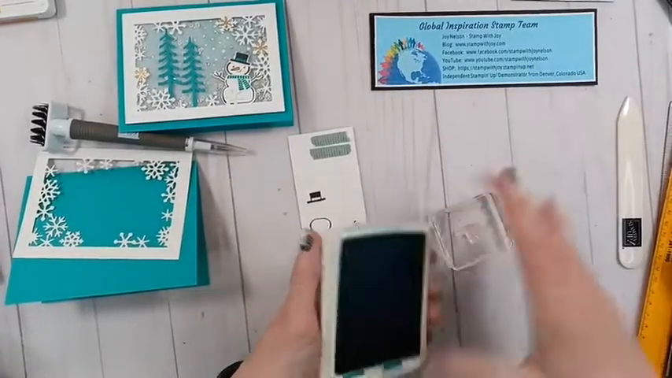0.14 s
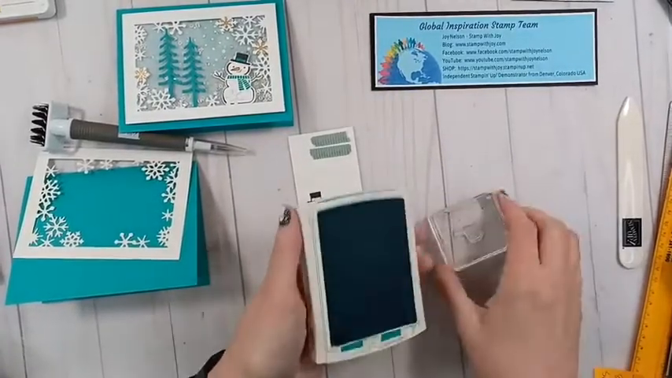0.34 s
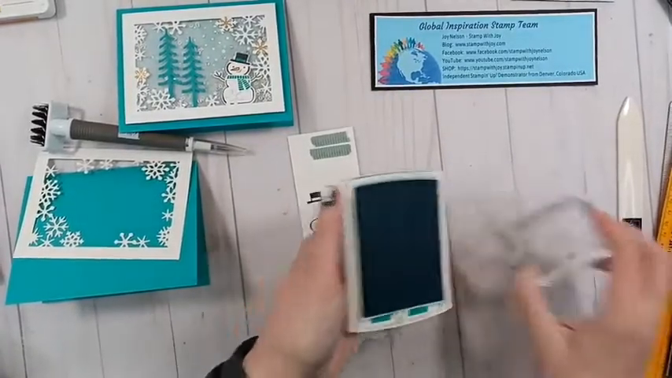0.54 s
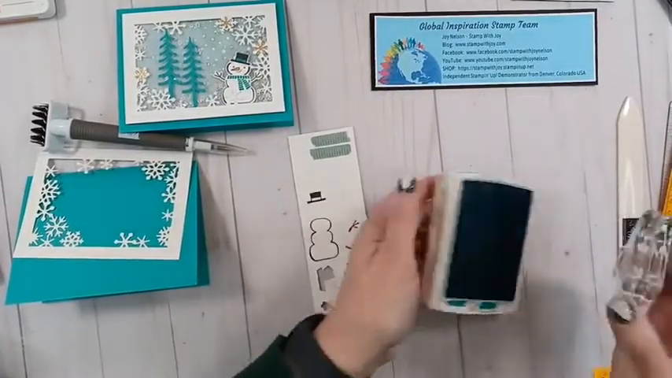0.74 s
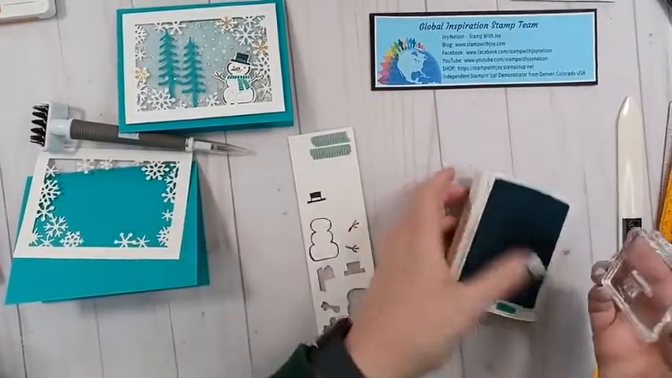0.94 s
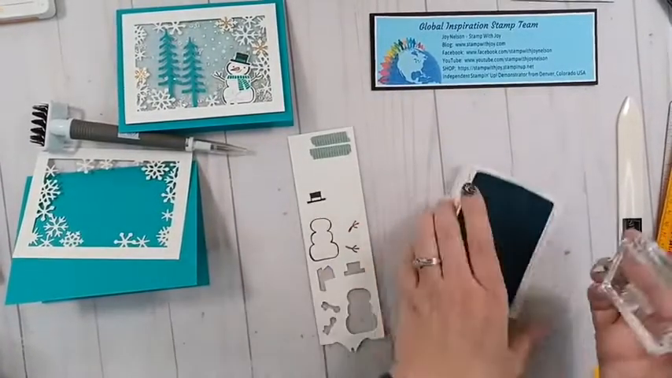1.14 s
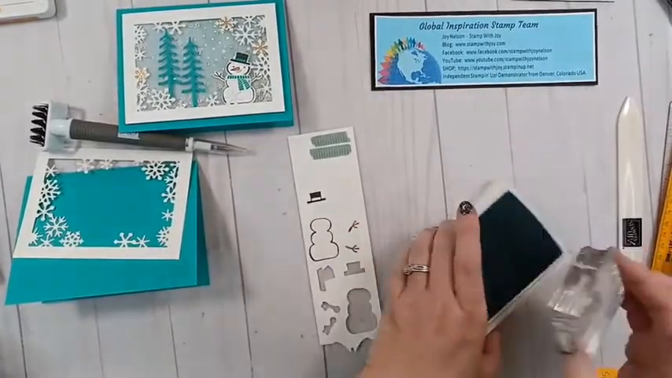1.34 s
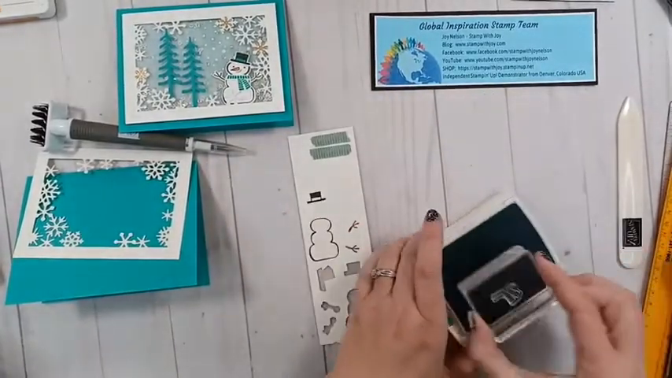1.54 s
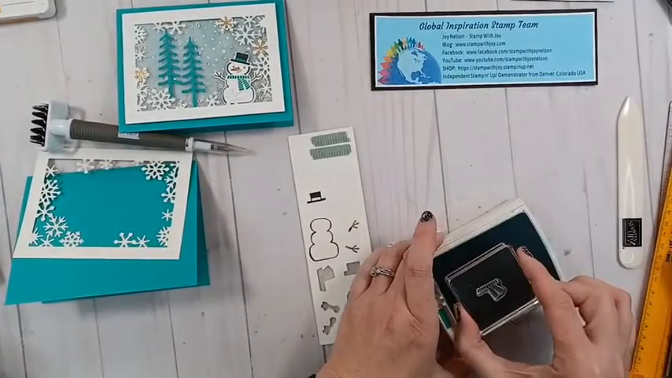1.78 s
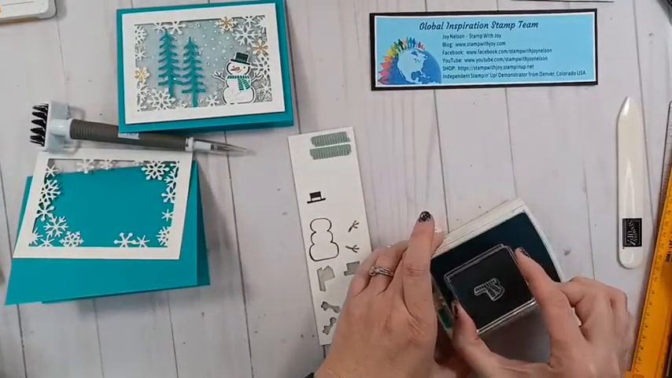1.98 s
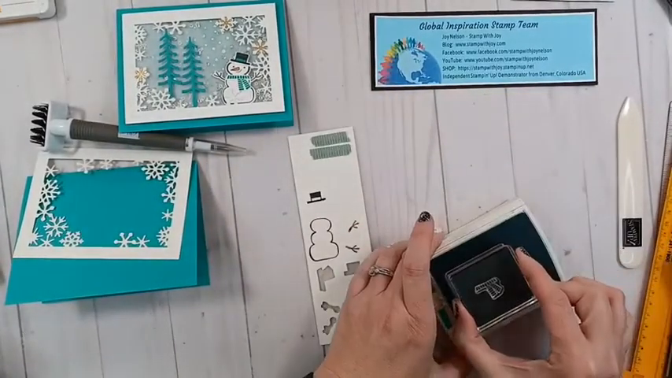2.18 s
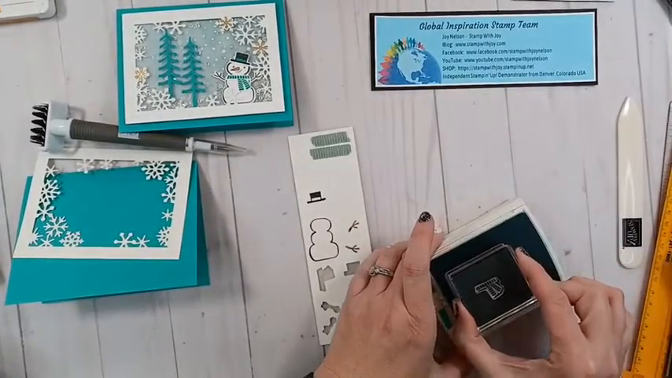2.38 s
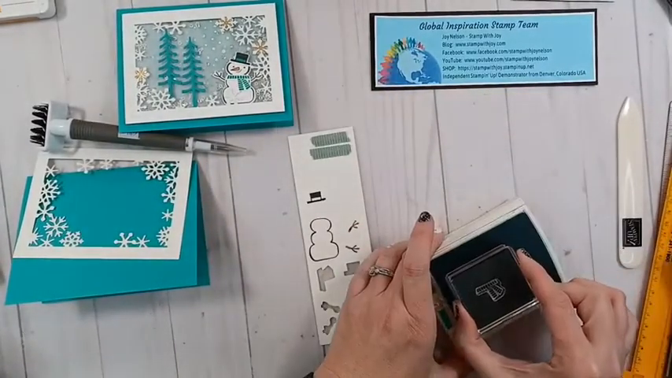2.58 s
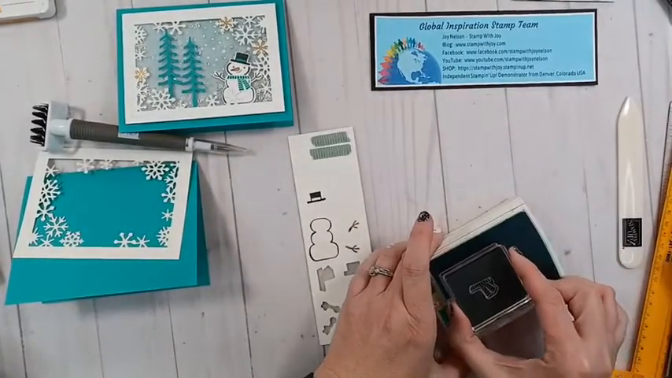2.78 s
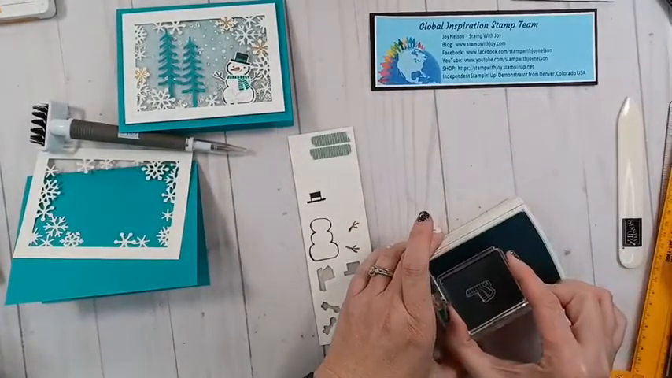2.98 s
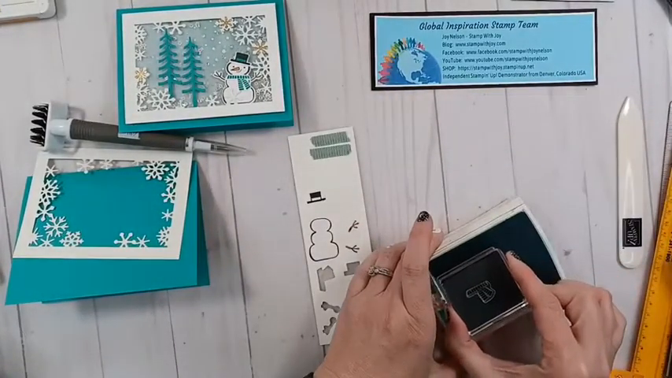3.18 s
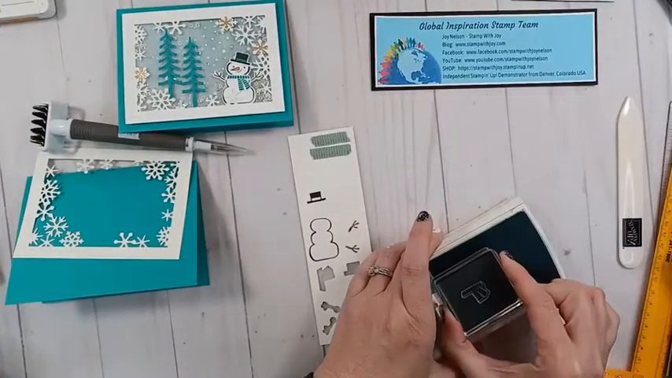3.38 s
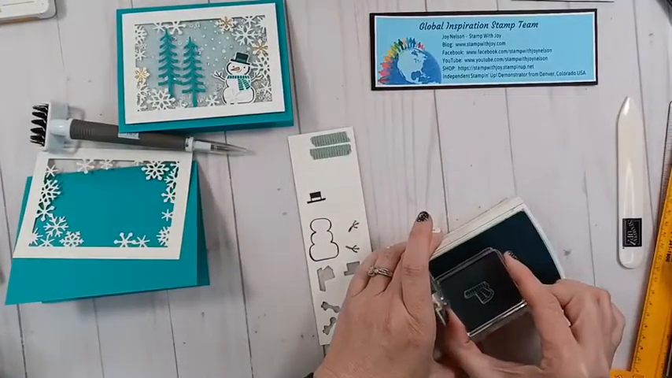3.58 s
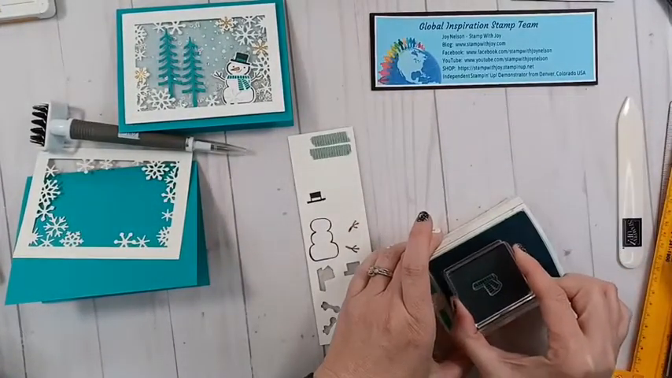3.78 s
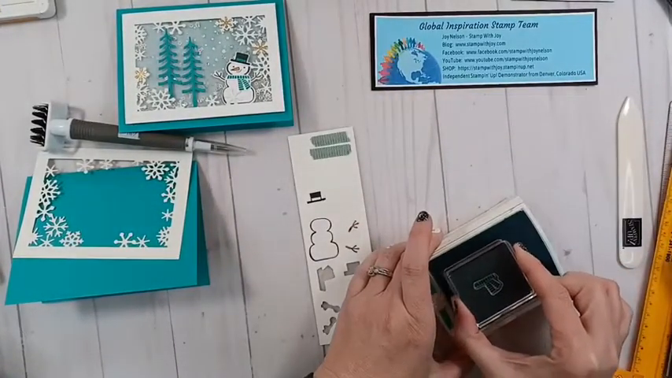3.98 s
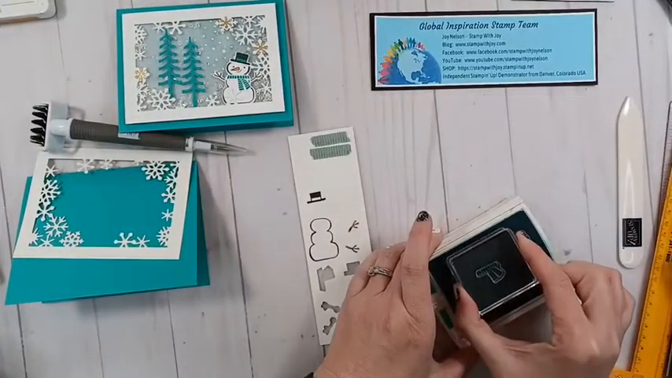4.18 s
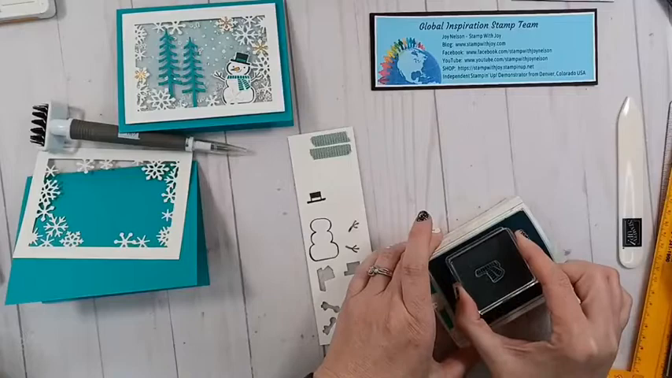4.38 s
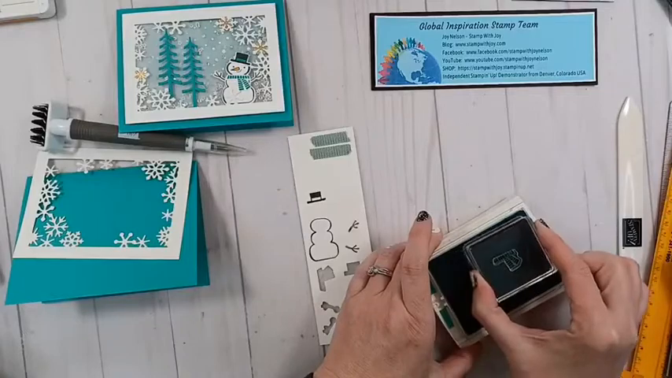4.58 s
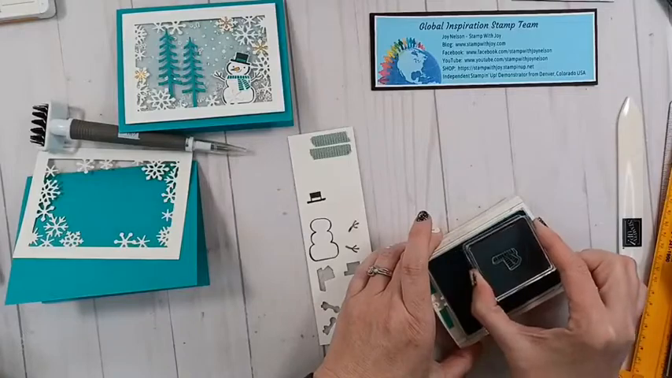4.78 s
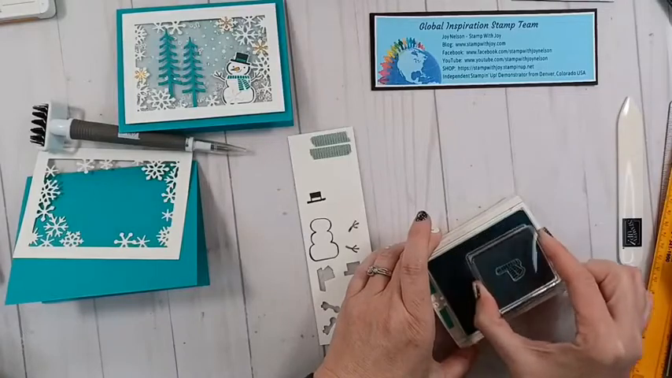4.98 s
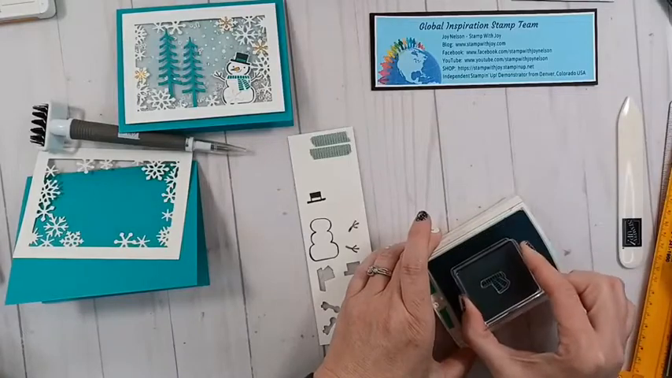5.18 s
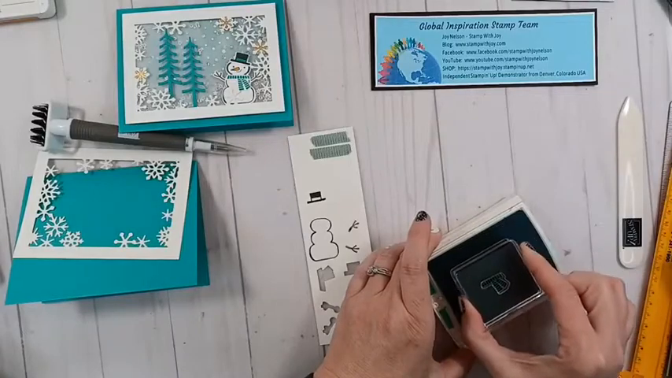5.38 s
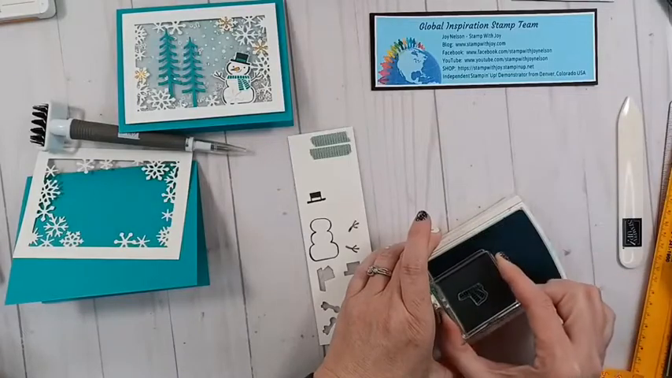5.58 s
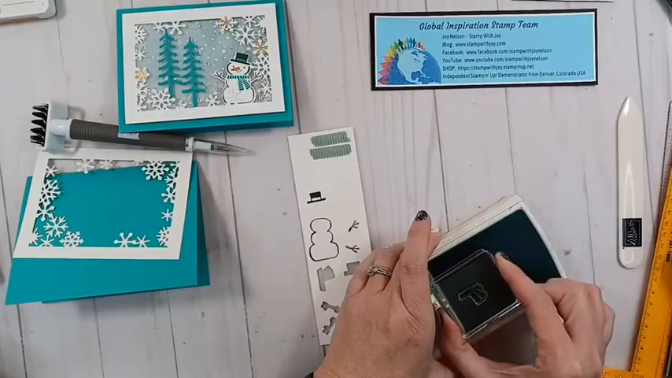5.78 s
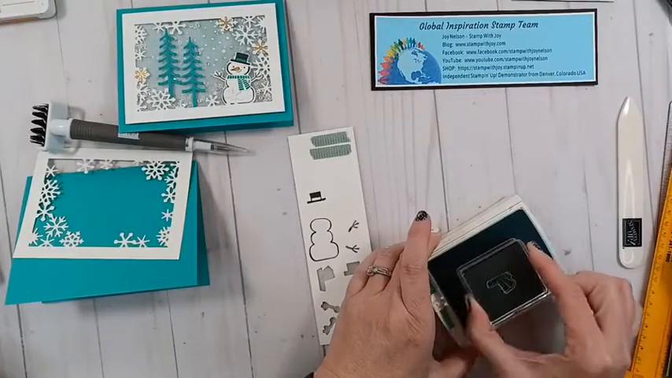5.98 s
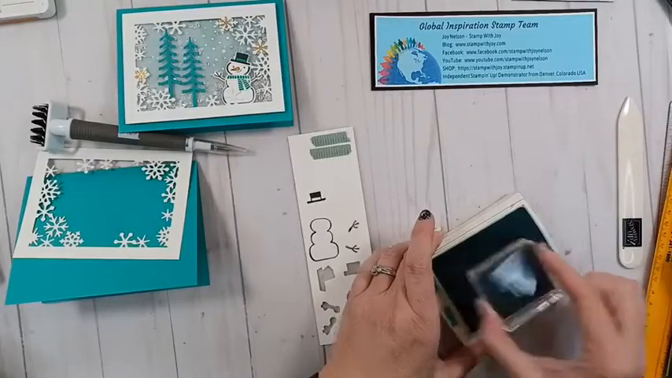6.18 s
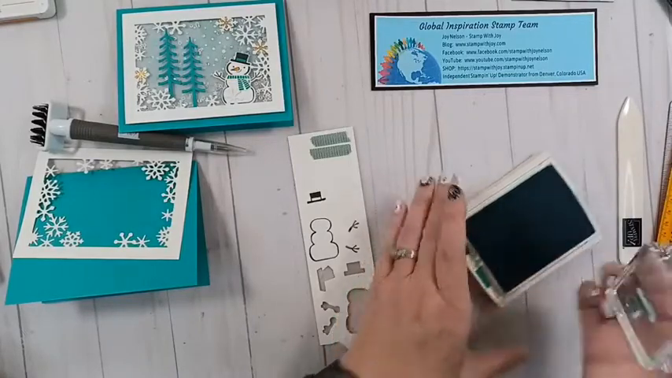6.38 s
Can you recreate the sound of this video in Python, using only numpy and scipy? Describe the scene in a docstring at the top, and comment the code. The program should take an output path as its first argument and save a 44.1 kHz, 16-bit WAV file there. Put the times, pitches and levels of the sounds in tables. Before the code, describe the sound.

In a small quiet room, fingers tap and rub a plastic ink pad case, its lid snaps, and it clatters onto a desk in two bursts with a brief rising scrape. After a pause, a stamp block pats the pad: barely audible landings, clearer hollow tocks and wet ticks as it peels away, the last one loudest. Close, nearly mono microphone, faint hum and rumble.

```python
"""An acrylic stamp block is patted on an ink pad: each soft landing and peel sounds a short swelling sine
for the hollow tock, coloured noise for the wet tick, and a squish. Before that the plastic pad is opened
with noise snaps, set down on a desk with clattering knocks that ring its modes, and nudged into place.
Hands, lid and case rub in swells of noise now and then, without echo. The place is a small room with a
faint wavering hum and low rumble, heard on a near-mono microphone."""
import sys
import numpy as np
from scipy import signal
from scipy.fft import rfft, irfft
from scipy.io import wavfile

SR = 44100
rng = np.random.default_rng(int(sys.argv[2]) if len(sys.argv) > 2 else 0)


def digitize_waveform(pressure):
    """Quantize a signal to 16-bit integers and store it at the path in sys.argv[1].

    Rows of a 2-D input are taken as channels; values are limited to [-1, 1].
    """
    field = np.atleast_2d(pressure).T
    bounded = np.clip(field, -1, 1)
    quanta = np.round(bounded * 32767).astype(np.int16)
    wavfile.write(sys.argv[1], SR, quanta)


N = 283894
TIME = np.arange(N) / SR

# All levels in the tables are settings ahead of the trims in the functions; spectra are relative.
# The stamp pulls free of the ink. Each row: start in seconds, tock in dB, tock pitch in Hz, tick in dB,
# tilt of the tick's top treble in dB, lead of the first edge in seconds, tock of that edge in dB.
PEELS = [(2.5483, -47.5, 923, -53.5, 0.5, 0.0059, -48.5), (2.891, -39, 1038, -58.5, 0, .0105, -49),
         (3.197, -33, 1074, -50, -4, 0.013, -48.5), (3.564, -39.5, 995, -51, 2.5, 0.0099, -47),
         (3.984, -35.5, 1028, -54, 0, 0.013, -46), (4.463, -36.5, 1020, -48.5, 0, .0106, -37),
         (4.9097, -27.5, 964, -42, -2.5, 0.014, -31.5), (5.4104, -32.5, 1042, -43.5, -12, .0195, -38),
         (5.8256, -44.5, 955, -53, 1.5, 0.0067, -46), (6.1686, -22.5, 1033, -33.5, -2, 0.0088, -36)]
# The stamp comes down on the pad. Each row: start in seconds, tock in dB, tick in dB, thump in dB.
LANDINGS = [(2.7371, -49.5, -57.5, -36), (2.9969, -58, -70.5, -49), (3.3064, -51.5, -65.5, -41.5),
            (3.713, -52, -57, -46.5), (4.1925, -55, -87, -53), (4.613, -44.5, -56.5, -44),
            (5.155, -51, -54.5, -50), (5.594, -53.5, -84, -56), (5.996, -49.5, -54, -40)]
LANDING_HZ, LANDING_TOP_DB = 990, 1
# Fingers tap the case while opening it. Each row: start in seconds, tock in dB, tock pitch in Hz, tick in dB.
FINGER_TAPS = [(0.073, -46.5, 1340, -57), (0.0788, -56, 1010, -61), (0.093, -54, 1030, -55),
               (0.1989, -65, 990, -65)]
# Colour of the wet tick. Each row: frequency in Hz, level in dB per Hz.
TICK_SPECTRUM = [(70, 5), (250, 8.5), (400, 4), (520, -0.5), (900, 5), (1700, -7.5), (2400, -5.5),
                 (3100, -5), (3750, -4.5), (4300, -9.5), (5000, -7), (6500, -10.5), (9000, -14.5),
                 (15000, -21)]
# Colour of the hollow body under squish and scrape. Each row: frequency in Hz, level in dB per Hz.
BODY_SPECTRUM = [(400, -27), (750, -8), (1000, 3.5), (1200, -4), (1600, -14.5), (2500, -22), (5000, -48)]
# The case knocks on the desk. Each row: start in seconds, case ring in dB, crack in dB, desk ring in dB,
# thump in dB.
KNOCKS = [(0.7969, -19.5, -27.5, -36, -27.5), (0.8224, -23.5, -37, -36.5, -37.5),
          (0.863, -24, -49, -31, -40), (0.875, -20.5, -35.5, -32.5, -33), (0.897, -29.5, -49.5, -44, -23.5),
          (1.133, -19, -22, -17, -17.5), (1.163, -29.5, -39, -36, -22), (1.179, -22, -36.5, -29.5, -20.5),
          (1.2015, -22.5, -35.5, -31, -22.5), (1.214, -34, -48, -41.5, -31.5), (1.352, -42, -54, -60, -40)]
REBOUND_GAP_S, REBOUND_LOSS_DB = .0048, 4.5  # mean gap and loss per rebound of a knock
# Modes of the plastic case. Each row: frequency in Hz, level in dB, 60 dB decay in seconds.
CASE_MODES = [(698, -22, 0.099), (861, -13.5, 0.07), (930, -13, .07), (983, -12.5, 0.086),
              (990, -15, 0.038), (1107, -8.5, 0.086), (1205, -15, .09), (1194.5, -16.5, 0.16),
              (1224, -14.5, 0.073), (1426, -14, 0.08), (1547, -13.5, 0.058), (1604, -19, .05),
              (2490, -21.5, 0.065), (3279, -27, 0.072), (3790, -30, 0.05), (4860, -28, 0.11)]
# Modes of the desk's knock. Each row: frequency in Hz, level in dB, 60 dB decay in seconds.
DESK_MODES = [(201, -10, 0.13), (240, -5, 0.041), (322, -14, .11), (370.3, -7.5, 0.11), (417, -10.5, 0.031),
              (500, -6, 0.075), (667, -13.5, 0.15)]
# Modes of the desk's sway. Each row: frequency in Hz, level in dB, 60 dB decay in seconds.
SWAY_MODES = [(86.5, -10.5, 0.17), (132, -2, 0.16), (195.1, -23.5, 0.11), (228.5, -11, 0.19)]
# Colour of the hard crack. Each row: frequency in Hz, level in dB per Hz.
CRACK_SPECTRUM = [(250, -4), (700, -6), (1500, 0), (2000, -0.5), (2500, 4), (3500, -3), (5200, -3),
                  (7000, -8.5), (9000, -14), (13000, -8.5), (16000, -17.5)]
# The lid snaps into its catches. Each row: start in seconds, level in dB.
SNAPS = [(0.302, -47.5), (0.309, -32), (0.331, -35.5), (0.411, -60.5)]
SLIP_GAP_S, SLIP_LOSS_DB = .0045, 1  # mean gap and loss per small slip of a snap
LID_THUMP_DB = -8  # jolt to the desk, relative to the snap
# Colour of a lid snap. Each row: frequency in Hz, level in dB per Hz.
LID_SPECTRUM = [(300, -9), (1000, -18.5), (1500, -11.5), (2000, -11), (2350, 2), (2680, 1), (3100, -6),
                (3600, -7), (4300, -18.5), (5100, -14.5), (6500, -25), (9000, -28.5), (15000, -24)]
# Rubbing and scraping of the lid and case. Each row: loudest moment in seconds, rise in seconds,
# fall in seconds, hiss in dB, hollow body in dB.
SLIDES = [(0.005, 0.036, 0.079, -68.5, -63.5), (0.385, 0.024, 0.1, -62, -78),
          (1.035, .11, 0.14, -78.5, -54), (1.335, .09, 0.13, -62, -60), (6.254, 0.061, 0.17, -53.5, -55)]
# Colour of the scrape's hiss. Each row: frequency in Hz, level in dB per Hz.
SLIDE_SPECTRUM = [(180, -53.5), (300, -10.5), (366, -9), (511, -26), (555, -9.5), (678, -11.5),
                  (1040, -11.5), (1640, -13.5), (2840, -4.5), (3240, -12.5), (4670, -11), (8090, -23.5),
                  (16000, -20.5)]
# The case dragged into place: loudest moment, rise, fall, level; then its pitch at that moment and climb.
DRAG_AT_S, DRAG_RISE_S, DRAG_FALL_S, DRAG_DB = 1.088, .065, .026, -59
DRAG_HZ, DRAG_HZ_PER_S = 2530, 6500
# Skin brushes over plastic. Each row: loudest moment in seconds, rise in seconds, fall in seconds,
# level in dB.
SKIN = [(0.5, 0.13, .13, -76), (0.66, 0.1, .11, -64.5), (0.775, 0.066, .04, -59.5), (1.4, 0.12, .2, -76.5)]
# Colour of the skin's brushing. Each row: frequency in Hz, level in dB per Hz.
BRUSH_SPECTRUM = [(1180, -53.5), (2000, -11), (3490, -14.5), (5030, 0), (8930, -7), (15100, 1), (16000, -6)]
# The room's echoes. Each row: frequency in Hz, level in dB.
ROOM_LEVELS = [(100, -11.5), (450, -4), (950, -9.5), (1300, -8), (2000, -4.5), (3500, -7.5), (6500, -8.5),
               (14000, -6)]
# How long the room rings. Each row: band centre in Hz, 60 dB decay in seconds.
ROOM_T60 = [(100, .2), (450, .19), (950, .19), (1300, .2), (2000, .25), (3500, .31), (6500, .3),
            (14000, .24)]
# Level of the hum over time. Each row: time in seconds, level in dB.
HUM_LEVELS = [(0.0, -72), (0.29, -76.5), (0.53, -71.5), (0.82, -90), (0.99, -74.5), (1.2, -62.5),
              (1.52, -74), (1.95, -67.5), (2.51, -72), (2.67, -65), (2.78, -68), (2.97, -70.5),
              (3.11, -64.5), (3.2, -61.5), (3.58, -74.5), (5.35, -76.5), (5.57, -83), (5.78, -85.5),
              (6.12, -76), (6.43, -84.5)]
HUM_HZ, WHINE_HZ, WHINE_DB = 225.6, 625, -83.5
# Colour of the low rumble. Each row: frequency in Hz, level in dB per Hz.
RUMBLE_SPECTRUM = [(40, -19.5), (65, -14), (90, 6), (125, 2.5), (170, -6.5), (300, -33.5)]
RUMBLE_DB, RUMBLE_SWING_DB = -76.5, 3
# Colour of the steady noise floor. Each row: frequency in Hz, level in dB per Hz.
FLOOR_SPECTRUM = [(18, -63), (30, -31.5), (88, -8), (165, -14), (221, -3), (252, -15.5), (280, -14),
                  (426, -24), (569, -22), (632, -24.5), (740, -26.5), (1540, -27), (5900, -43),
                  (13700, -48.5), (16000, -48)]
FLOOR_DB = -76
CUTOFF_HZ = 16000


def touches(edge_pitch=1.053, edge_tick_db=-11.0, edge_slowness=1.21, tear_db=-5.5, tear_tick_db=-10.5,
            finger_top_db=3.0):
    """All pad contacts; in a peel one edge eases off, the ink tears, then the rest pops free."""
    # each row: start in seconds, tock in dB, pitch in Hz, tick in dB, top treble in dB, slowness
    rows = [(s, db, hz, tick_db, finger_top_db, 1) for s, db, hz, tick_db in FINGER_TAPS]
    rows += [(s, db, LANDING_HZ, tick_db, LANDING_TOP_DB, 1) for s, db, tick_db, _ in LANDINGS]
    for s, db, hz, tick_db, top_db, lead_s, edge_db in PEELS:
        tear_s = s - lead_s * rng.uniform(0.42, .65)
        rows += [(s - lead_s, edge_db, hz * edge_pitch, tick_db + edge_tick_db, top_db, edge_slowness),
                 (tear_s, edge_db + tear_db, hz, tick_db + tear_tick_db, top_db, 1),
                 (s, db, hz, tick_db, top_db, 1)]
    return rows


def taps(contacts, tock_db=0.0, tick_db=0.5, desk_db=-21.0, swell_s=0.00098, tick_t60=0.015, ping_db=-6.0):
    """Each touch sounds the pad, ticks with wet rubber and passes a little into the desk."""
    out = np.zeros(N)
    for s, db, hz, wet_db, top_db, slowness in contacts:
        tick = burst(tick_colour(top_db), tick_t60, rise_s=0.00017)
        add(out, s, amp(db + tock_db) * tock(hz, swell_s * slowness))
        add(out, s + .0006, amp(wet_db + tick_db) * tick)
        add(out, s + 0.0018, amp(db + desk_db) * strike(DESK_MODES, spread_db=5.5, rise_s=0.019))
        # the tick has one broad peak, which sits higher for light touches
        peak_hz = np.interp(db, [-50, -44], [5100, 3750])
        peak = [(peak_hz / 2, -40), (peak_hz * .85, -14), (peak_hz, 0), (peak_hz / .85, -14),
                (peak_hz * 2, -40)]
        add(out, s + 0.00077, amp(wet_db + ping_db) * burst(peak, tick_t60, rise_s=0.00057))
    return out


def tock(hz, swell_s, size=4096):
    """The cushioned pad in its hollow case swells and dies within a few cycles."""
    t = TIME[:size]
    envelope = (t / (2 * swell_s)) ** 2 * np.exp(2 - t / swell_s)
    return envelope * np.sin(2 * np.pi * hz * t)


def tick_colour(top_db):
    """A sharper or softer touch tilts the top of the tick's spectrum."""
    return [(hz, db + top_db * np.interp(hz, [4500, 9000], [0, 1])) for hz, db in TICK_SPECTRUM]


def squish(contacts, body_db=-20.0, wet_db=-9.0, cling_db=-19.5, width_s=0.003, cling_s=0.0059,
           lag_s=.005, size=5800):
    """The inked fabric crushes as the rubber sinks in, and rustles faintly for as long as it clings."""
    out, t = np.zeros(N), TIME[:size]
    middle = t[-1] / 2
    press = 1 / np.cosh((t - middle) / width_s)
    cling = 1 / np.cosh((t - middle) / cling_s)
    wetness = amp(wet_db) * press + amp(cling_db) * cling
    for s, db, _, tick_db, top_db, _ in contacts:
        crush = amp(db + body_db) * press * noise(BODY_SPECTRUM, size=size)
        rustle = wetness * amp(tick_db) * noise(tick_colour(top_db - 5.0), size=size)
        add(out, s + lag_s - middle, crush + rustle)
    return out


def knocks(case_db=-6.5, tock_db=-2.5, crack_db=0.0, desk_db=-1.5, crack_t60=.03, pad_hz=1090,
           pad_scatter=0.14):
    """Case edges and corners ring case and desk; each rebound cracks and jolts the pad at its own pitch."""
    out = np.zeros(N)
    for s, ring_db, hard_db, heavy_db, _ in KNOCKS:
        add(out, s, amp(ring_db + case_db) * strike(CASE_MODES, spread_db=5.5, rise_s=.0004))
        add(out, s, amp(heavy_db + desk_db) * strike(DESK_MODES, spread_db=2.0, rise_s=0.0027))
        for delay, db in chatter(REBOUND_GAP_S, REBOUND_LOSS_DB, count=4):
            jolt_hz = pad_hz * np.exp(pad_scatter * rng.standard_normal())
            crack = burst(CRACK_SPECTRUM, crack_t60, rise_s=0.00065)
            add(out, s + delay, amp(db + ring_db + tock_db) * tock(jolt_hz, swell_s=0.00086))
            add(out, s + delay - .0005, amp(db + hard_db + crack_db) * crack)
    return out


def thumps(level_db=-1.5, recoil_db=-33.5, recoil_follows=0.38, cushion_s=0.014):
    """The desk top sways in its low modes: at once under case and lid, gently through the cushioning pad."""
    hard = [(s, db) for s, *_, db in KNOCKS] + [(s, db + LID_THUMP_DB) for s, db in SNAPS]
    soft = [(s, db) for s, *_, db in LANDINGS]
    soft += [(s, recoil_db + recoil_follows * db) for s, db, *_ in PEELS]  # the pad recoils from a peel
    out = np.zeros(N)
    for blows, rise_s in ((hard, .00083), (soft, cushion_s)):
        for s, db in blows:
            add(out, s, amp(db + level_db) * strike(SWAY_MODES, spread_db=1.5, rise_s=rise_s))
    return out


def lid(level_db=-2.0, snap_t60=0.022):
    """The lid slips home in quick runs of bright, short snaps."""
    out = np.zeros(N)
    for s, db in SNAPS:
        for delay, slip_db in chatter(SLIP_GAP_S, SLIP_LOSS_DB, count=7):
            snap = burst(LID_SPECTRUM, snap_t60, rise_s=0.001)
            add(out, s + delay, amp(db + slip_db + level_db) * snap)
    return out


def rubbing(scrape_db=0.0, body_db=-4.0, brush_db=1.0, grain_db=1.0):
    """Friction hiss, made grainy by tiny slips; the dragged case rises in pitch as it speeds up."""
    grain = rms_one(amp(grain_db * noise([(20, -2), (300, 1.5), (1500, -29.5)])))
    hiss, body = amp(scrape_db) * noise(SLIDE_SPECTRUM), amp(body_db) * noise(BODY_SPECTRUM)
    scrape = sum(swell(s, rise, fall) * (amp(hiss_db) * hiss + amp(hollow_db) * body)
                 for s, rise, fall, hiss_db, hollow_db in SLIDES)
    strokes = sum(amp(db) * swell(s, rise, fall) for s, rise, fall, db in SKIN)
    brush = amp(brush_db) * noise(BRUSH_SPECTRUM) * strokes
    # the drag is a narrow noise band carried on the gliding resonance
    hz = DRAG_HZ + DRAG_HZ_PER_S * np.clip(TIME - DRAG_AT_S, -2 * DRAG_RISE_S, 0)
    glide = np.exp(2j * np.pi * np.cumsum(hz) / SR)
    width = [(20, 0.0), (200, 1.5), (500, -8), (1500, -27)]
    resonance = rms_one(glide.real * noise(width) + glide.imag * noise(width))
    drag = amp(DRAG_DB) * swell(DRAG_AT_S, DRAG_RISE_S, DRAG_FALL_S) * resonance
    return grain * (scrape + brush + drag)


def room(x, build_s=0.012, early_db=0.0, early_t60=0.11, size=22050):
    """Strong early echoes from nearby things, then a dense tail that dies band by band."""
    t, hz = TIME[:size], np.arange(size // 2 + 1) * SR / size
    white, centres = rfft(rng.standard_normal(size)), np.array(ROOM_T60)[:, 0]
    onset = (1 - np.exp(-(t / build_s) ** 2)) * (1 + amp(early_db) * dying(t, early_t60))
    echoes = 0
    for share, (centre, t60) in zip(np.eye(len(centres)), ROOM_T60):
        band_gain = np.interp(np.log(hz + 1), np.log(centres), share)  # overlapping triangular bands
        band = irfft(white * band_gain * amp(at_hz(ROOM_LEVELS, hz)), size)
        fade = onset * dying(t, t60)
        echoes = echoes + band * fade / np.sqrt(np.sum(fade ** 2))
    return signal.fftconvolve(x, echoes)[:N]


def background(hum_db=3.5, waver=0.38):
    """A hum wavering in level and phase, a thin whine, swinging low rumble and a faint noise floor."""
    s, hum_level = np.transpose(HUM_LEVELS)
    slow = [(1, 4.5), (10, -2.0), (35, -19.5), (120, -66), (400, -120)]
    phase = 2 * np.pi * HUM_HZ * TIME
    hum = rms_one((1 + waver * noise(slow)) * np.sin(phase) + waver * noise(slow) * np.cos(phase))
    whine = rms_one(np.sin(2 * np.pi * WHINE_HZ * TIME + waver * noise(slow)))
    rumble = amp(RUMBLE_DB + RUMBLE_SWING_DB * noise(slow)) * noise(RUMBLE_SPECTRUM)
    return (amp(np.interp(TIME, s, hum_level) + hum_db) * hum + amp(WHINE_DB) * whine
            + rumble + amp(FLOOR_DB) * noise(FLOOR_SPECTRUM))


def strike(modes, spread_db, rise_s, size=16000):
    """One blow builds over rise_s; neighbouring modes swing opposite ways, each at a random strength."""
    t = TIME[:size]
    rings = 0
    for k, (hz, db, t60) in enumerate(modes):
        strength = (-1) ** k * amp(db + spread_db * rng.standard_normal())
        rings = rings + strength * dying(t, t60) * np.sin(2 * np.pi * hz * t)
    return rings * (1 - np.exp(-t / rise_s))


def burst(spectrum, t60, rise_s, size=4096):
    """The crowd of short high modes that a contact sets off, as decaying noise."""
    t = TIME[:size]
    return noise(spectrum, size=size) * dying(t, t60) * (1 - np.exp(-t / rise_s))


def chatter(gap_s, loss_db, count):
    """A contact and its unevenly spaced, ever weaker repeats: (delay in seconds, dB)."""
    gaps = gap_s * rng.uniform(.4, 1.6, count - 1)
    return zip(np.cumsum([0, *gaps]), -loss_db * np.arange(count))


def swell(at_s, rise_s, fall_s, roundness=1.3):
    """Gain of a rubbing stroke: a rounded hump, 20 dB down rise_s before and fall_s after its top."""
    t = TIME - at_s
    distance = np.abs(t / np.where(t < 0, rise_s, fall_s))
    return amp(-20 * np.minimum(distance ** roundness, 10))


def dying(t, t60):
    """Exponential decay, 60 dB down after t60."""
    return np.exp(-np.log(1000) * t / t60)


def noise(spectrum, size=N):
    """Noise of a given colour, rms 1."""
    hz = np.arange(size // 2 + 1) * SR / size
    return rms_one(irfft(rfft(rng.standard_normal(size)) * amp(at_hz(spectrum, hz)), size))


def at_hz(points, hz):
    """Read a table on a log-frequency axis."""
    f, value = np.transpose(points)
    return np.interp(np.log(hz + 1), np.log(f), value)


def amp(db):
    """Decibels to gain."""
    return 10 ** (np.asarray(db) / 20)


def rms_one(x):
    """Scale to unit rms."""
    return x / np.sqrt(np.mean(x ** 2) + 1e-20)


def add(track, s, sound):
    """Mix a sound into a track at time s."""
    i = int(s * SR)
    track[i:i + len(sound)] += sound[:N - i]


def scene(side_db=-35.5, side_hiss_db=-100.0):
    """Almost everything is mono; left and right differ only very faintly, in opposite ways."""
    contacts = touches()
    desk = taps(contacts) + squish(contacts) + knocks() + thumps() + lid()
    mid = desk + room(desk) + rubbing() + background()
    side_hiss = amp(side_hiss_db) * noise([(100, 5.0), (1000, 0.5), (15000, -2)])
    side = amp(side_db) * room(desk) + side_hiss
    return np.array([mid + side, mid - side])


def record(dry):
    """The microphone signal has its deep bass rolled off and its top cut steeply."""
    bass_cut = signal.butter(4, 58, "high", fs=SR, output="sos")
    top_cut = signal.ellip(10, .1, 80, CUTOFF_HZ, fs=SR, output="sos")
    return signal.sosfilt(top_cut, signal.sosfilt(bass_cut, dry))


dry = scene()
out = record(dry)
digitize_waveform(out)
```